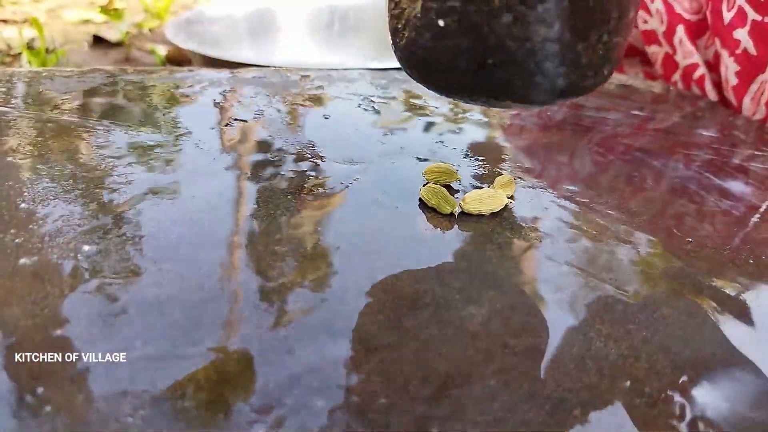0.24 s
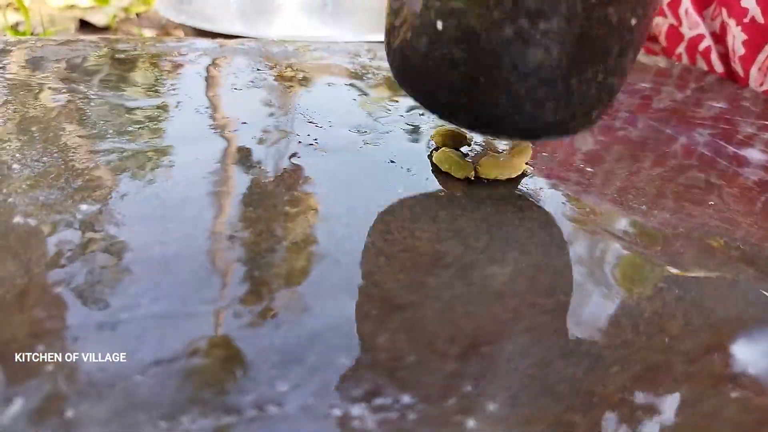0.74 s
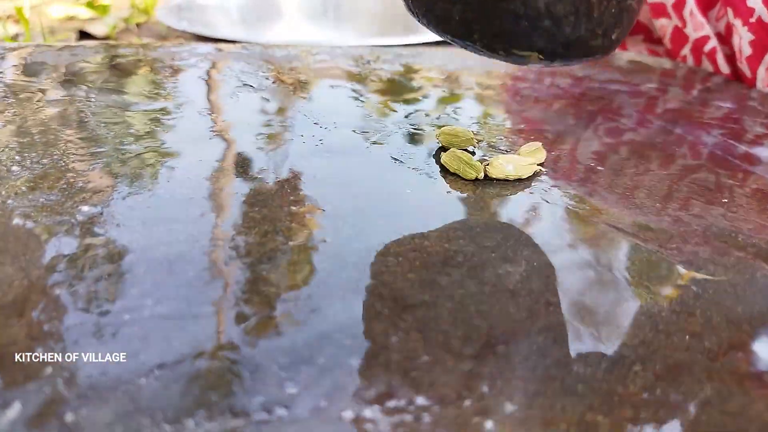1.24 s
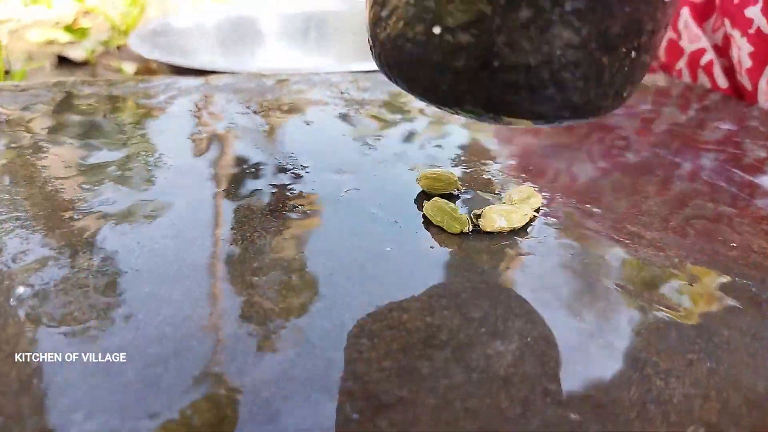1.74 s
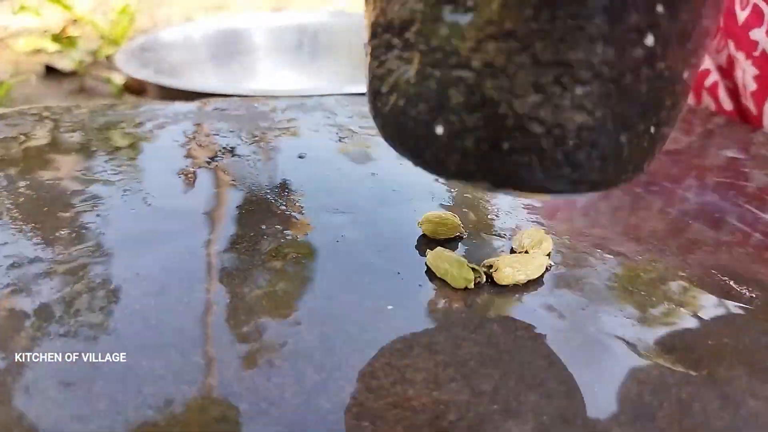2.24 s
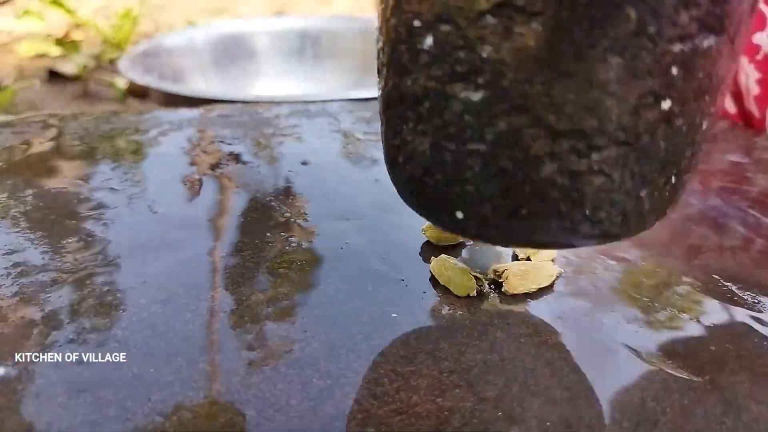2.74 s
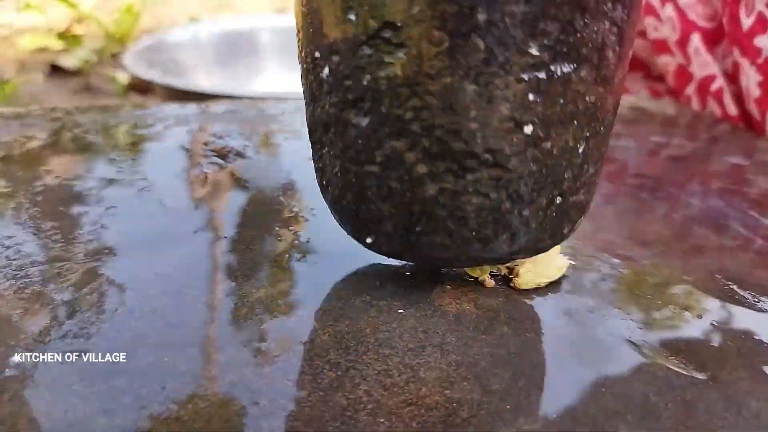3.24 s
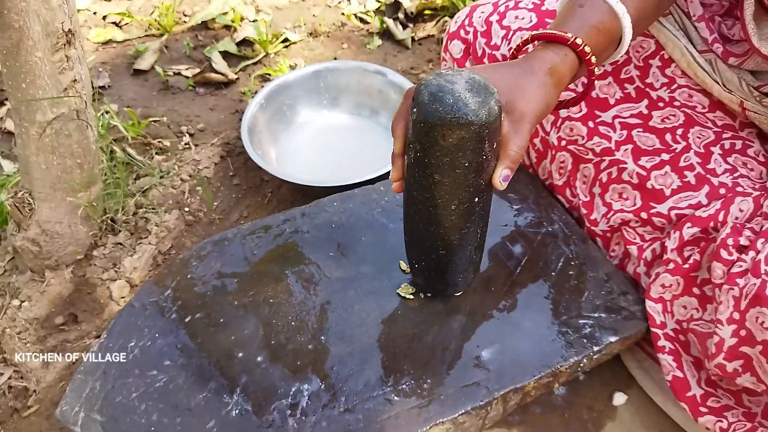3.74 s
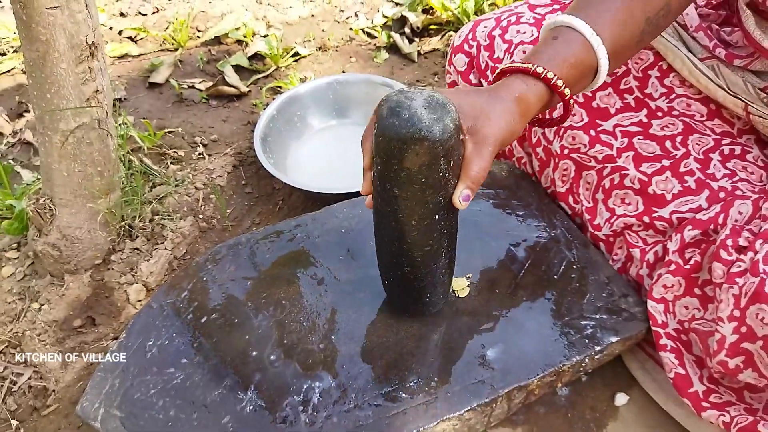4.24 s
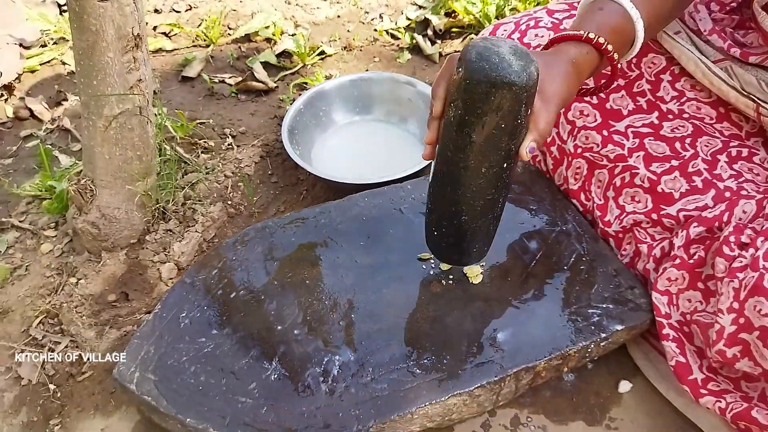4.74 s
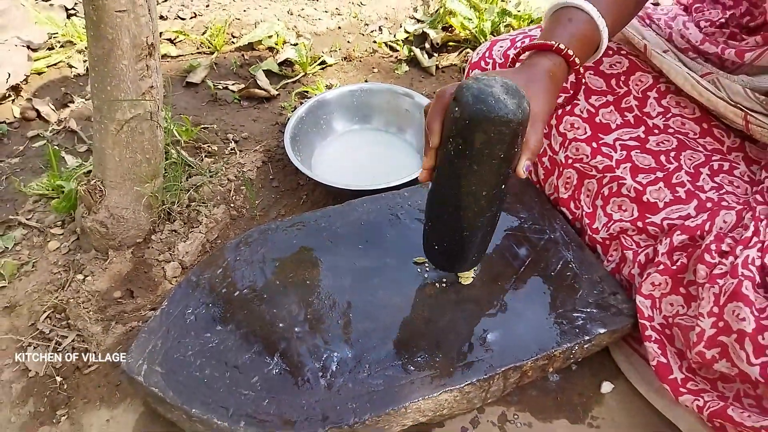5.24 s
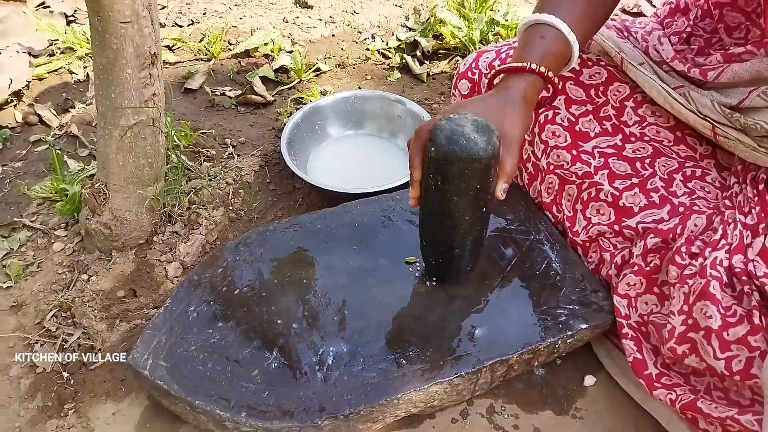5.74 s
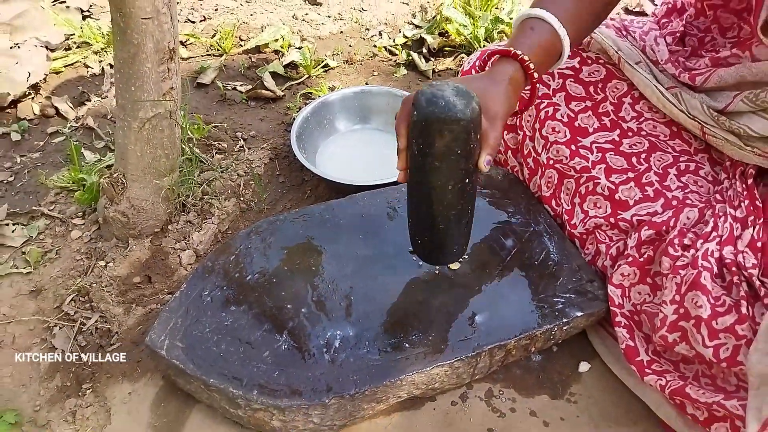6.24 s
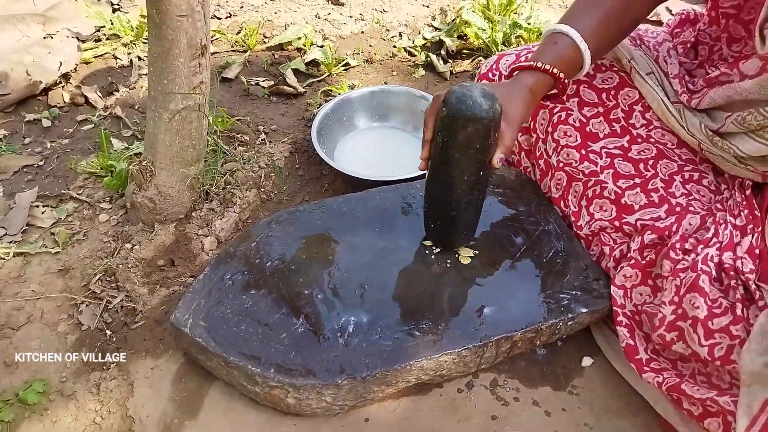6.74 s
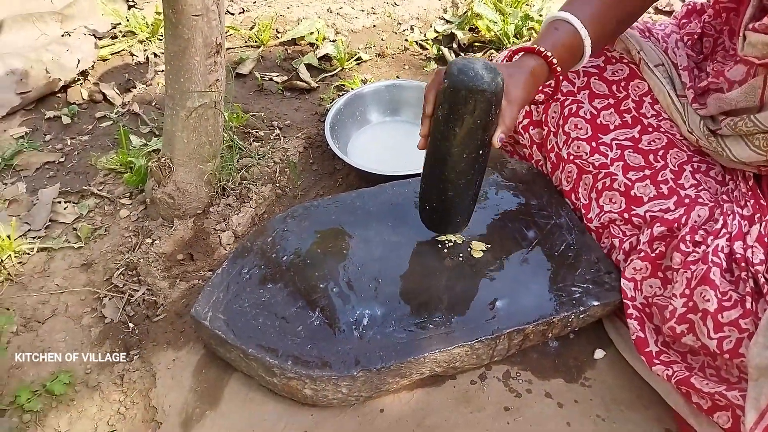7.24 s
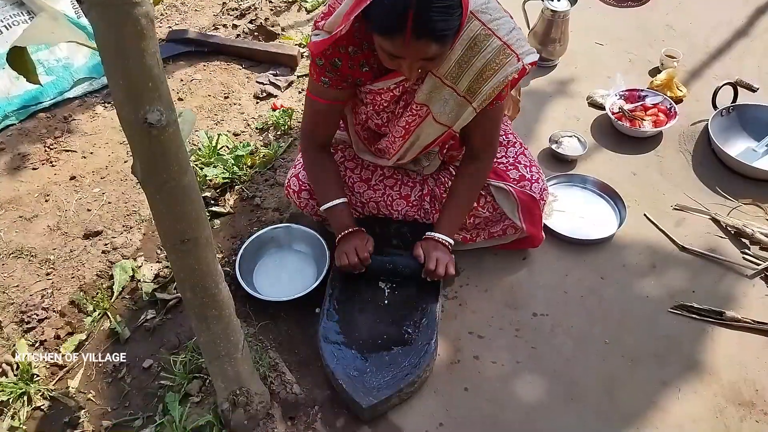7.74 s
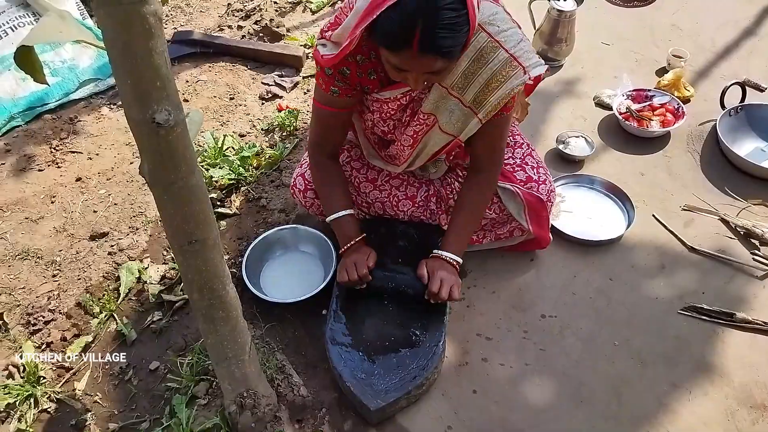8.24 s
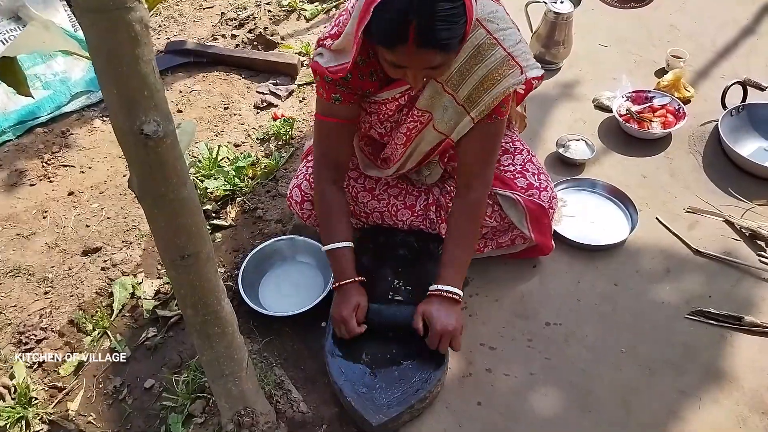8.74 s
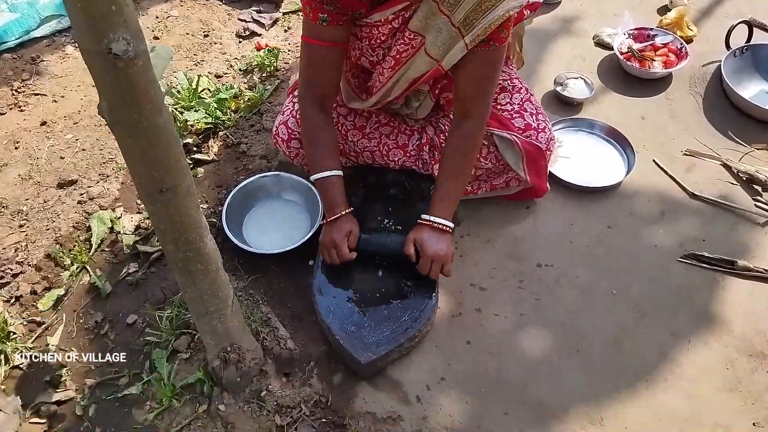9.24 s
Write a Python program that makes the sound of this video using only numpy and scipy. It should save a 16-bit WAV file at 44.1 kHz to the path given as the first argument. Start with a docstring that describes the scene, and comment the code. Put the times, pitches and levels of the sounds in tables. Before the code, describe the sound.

Outdoors over soft rumbling, hissing air with faint distant bird notes, an upright stone roller strikes a wet stone slab close to the microphone, each blow a crisp husk crunch, low thud and short stony ring. The view steps back and the blows grow harder and cleaner, with small snaps and wet fizz between them. Finally, further off, the flat roller rubs back and forth with knocks and crackles.

```python
"""Outdoors, over rumbling, hissing air, small birds call far off in thin sweeping notes.
Close to the microphones, the end of an upright stone roller pounds spice pods on a wet stone slab.
Each blow crunches husks in bursts of tiny cracks, thuds the slab on its earth bed and rings both stones.
From a step back the blows go on, single husks snap and wet pulp fizzes on the lifting roller.
Last, from further away, the roller lies flat: it rubs to and fro in filtered grains, knocks and crackles."""
import sys
import numpy as np
from scipy import signal
from scipy.fft import rfft, irfft
from scipy.io import wavfile
from scipy.ndimage import uniform_filter1d

SR = 44100
rng = np.random.default_rng(int(sys.argv[2]) if len(sys.argv) > 2 else 0)


def bounce(signal):
    """Save signal as a 16-bit WAV file at the path given by the first command-line argument."""
    frames = np.transpose(np.atleast_2d(signal))
    limited = np.clip(frames, -1, 1)
    pcm = np.round(limited * 32767).astype(np.int16)
    wavfile.write(sys.argv[1], SR, pcm)


N = 418509
TIME = np.arange(N) / SR
HIT = 8192  # samples in one short sound
PRE_S = .02  # room ahead of the contact in a short sound
SINCE = np.arange(HIT) / SR - PRE_S  # seconds since contact

# open air: start_s, rumble_db, hiss_db
AIR = [(0, -50.5, -56), (.5, -49.5, -58.5), (.68, -54, -65.5), (2.4, -54.5, -61.5), (3.35, -56, -65),
       (3.65, -52.5, -57), (4.9, -53, -57.5), (5.45, -52, -54.5), (6.05, -53, -54.5), (6.25, -58.5, -60.5),
       (6.75, -52.5, -56), (7.22, -57, -61.5), (7.75, -54, -55), (9.49, -53, -53.5)]
# colour of the low rumble of the air: pitch_hz, level_db
LOW_AIR_COLOUR = [(25, -17.5), (50, -11), (85, 5.5), (180, 5.5), (300, 2), (450, -3), (800, -15),
                  (1600, -53), (4000, -47.5)]
# colour of the distant hiss: pitch_hz, level_db
HIGH_AIR_COLOUR = [(300, 2.5), (1000, 1.5), (2300, 1.5), (3500, -3), (5000, -9), (7500, -14), (10000, -12),
                   (12500, -10.5), (15500, -20)]
# far bird notes: start_s, length_s, top_hz, arch_depth_hz, level_db
BIRD_NOTES = [(.09, 0.069, 2290, 50, -59), (2.234, 0.048, 4780, 500, -55.5), (2.33, .065, 4400, 700, -51.5),
              (2.387, 0.027, 4070, 1400, -55), (2.406, 0.036, 4450, 800, -60),
              (2.481, .045, 4970, 1100, -51), (2.533, 0.033, 3630, 910, -56.5),
              (2.614, 0.053, 4950, 1010, -58), (2.803, .035, 5050, 1100, -57.5),
              (2.853, 0.025, 4780, 1200, -52.5), (2.926, .025, 3720, 600, -64),
              (3.58, 0.15, 2170, 100, -62)]
# upright blows: start_s, strength_db, contact_ms, crunch_db, crunch_lead_ms
BLOWS = [(0.5718, -28.5, 0.66, -15, -0.5), (0.8607, -42.5, 1.1, -17.5, 2), (1.1379, -44, 1.36, -17, -0.4),
         (1.4046, -21, 1.02, -21.5, 4.5), (1.6681, -27, 0.58, -17, 2.5), (1.9313, -21.5, 0.94, -20, 2.3),
         (2.199, -18.5, 0.7, -21, .5), (2.4625, -16, .58, -27, 1.1), (2.72, -17.5, 0.65, -26, .9),
         (2.9834, -24.5, 0.88, -22, 3), (3.2605, -27.5, 0.62, -18, 3), (3.4511, -22, 0.87, -30, .5),
         (3.7257, -27.5, 1.05, -30, 3.5), (4.0083, -18, 0.68, -30, -0.5), (4.2729, -18, 0.78, -23.5, 1.5),
         (4.5469, -13, 0.51, -29.5, -0.3), (4.8499, -18.5, 0.85, -29, -0.5),
         (5.1354, -14.5, 0.67, -33.5, 2), (5.46, -26.5, 1.06, -24.5, 3.5), (5.7503, -27, 1.09, -30, 4.5),
         (6.1685, -12, 0.11, -37, 1), (6.5088, -16.5, 0.66, -32.5, 2), (6.7741, -13.5, 0.43, -30, -0.5),
         (7.0733, -13.5, 0.27, -33.5, 3), (7.0953, -31, 0.21, -54, 1.5)]
# slab rocking on the earth: pitch_hz, level_db, t60_s
BED_MODES = [(119.3, -5.5, .065), (186, -0.5, 0.046), (232, 2.5, 0.028), (331, -3.5, 0.028)]
# slab bending: pitch_hz, level_db, t60_s
SLAB_MODES = [(656.4, -2.5, 0.031), (721, 1, 0.024), (826, 1, 0.017), (1005, 5.5, 0.014),
              (1225, 7.5, 0.016)]
# roller bending: pitch_hz, level_db, t60_s
ROLLER_MODES = [(1336, -3, .014), (1558, 4, 0.022), (1757, -3.5, 0.043), (2072, -14, 0.029),
                (2540, -25.5, 0.015), (2950, -18.5, 0.01)]
# roller held upright, free to ring on across and along its length: pitch_hz, level_db, t60_s
UPRIGHT_MODES = [(1545, -13, .115), (4870, 8, .048), (4990, -2, .025)]
# colour of rough stone faces chattering: pitch_hz, level_db
CLACK_COLOUR = [(200, -14.5), (450, -12.5), (680, 5.5), (1000, -3.5), (1500, -1.5), (2000, -7.5),
                (2800, -12.5), (4000, -20), (6000, -38), (12000, -39.5)]
# colour of breaking husks: pitch_hz, level_db
HUSK_COLOUR = [(400, -4), (1000, -26), (2200, -16), (3500, -8.5), (5000, -0.5), (7000, 1), (9000, 3),
               (11000, 6), (11700, 2.5), (13000, 4.5), (15300, -3), (17000, -15)]
# colour of cracking seeds: pitch_hz, level_db
SEED_COLOUR = [(300, -2.5), (800, -8), (1500, -6.5), (2300, -2), (3000, -3), (4200, -10), (7000, -9.5),
               (14000, -40)]
# each part heard close up: left_minus_right_db, left_lead_ms
CLOSE_PLACES = {"bed": (1.2, .85), "slab": (3.5, .35), "roller": (.5, -.12), "husk": (-4, -.25)}
# each part heard from a step back: left_minus_right_db, left_lead_ms
BACK_PLACES = {"bed": (0, .03), "slab": (3.5, .03), "roller": (1.5, -.12), "husk": (-4, .07)}
# each part heard from further away: left_minus_right_db, left_lead_ms
FAR_PLACES = {"bed": (-.5, 0), "slab": (2.5, .1), "roller": (7, -.06)}
# single husks snap and wet bits unstick: start_s, relative_level_db
SNAPS = [(3.8289, -22), (3.8334, -29), (3.8724, -29), (4.7308, -33.5), (4.7617, -38), (5.8382, -31.5),
         (5.9333, -36), (7.4833, -23.5), (7.89, -31), (7.94, -26), (8.0022, -37.5), (8.305, -35),
         (8.331, -29), (8.349, -27), (8.382, -32.5), (8.7057, -28.5), (8.754, -28.5), (8.773, -30.5),
         (9.1345, -23), (9.1477, -24.5), (9.178, -27)]
# colour of snaps, fizz and crackle: pitch_hz, level_db
GRIT_COLOUR = [(1500, -17), (4000, -0.5), (7000, 4), (9500, 9), (11000, 5), (12500, 1), (15500, -1.5),
               (17000, -26.5)]
# wet pulp clings to the lifting roller and fizzes: start_s, length_s, relative_level_db
PULP = [(4.623, 0.39, -62), (5.23, 0.36, -58.5), (5.801, 0.54, -66), (6.48, .3, -60.5)]
# one push and pull of the flat roller each: start_s, stone_rumble_db, paste_grit_db, husk_crackle_db
STROKES = [(7.338, -47.5, -59, -54), (7.744, -46, -59.5, -54), (8.151, -51, -64.5, -53),
           (8.55, -47, -61, -50), (8.948, -45, -58, -52), (9.345, -49, -62, -56)]
# colour of the stones rubbing: pitch_hz, level_db
RUMBLE_COLOUR = [(200, -18), (450, -25.5), (660, 1), (900, -10.5), (1300, -7), (1570, 9), (1900, -8.5),
                 (3000, -7.5), (5000, -8)]
# colour of paste squeezed under the flat roller: pitch_hz, level_db
SQUELCH_COLOUR = [(2000, -46), (4500, 4), (7500, -11.5), (9400, 13.5), (11000, -1), (12500, -2),
                  (14000, -4), (15500, 9), (17000, -30)]
# the flat roller tips onto the slab: start_s, contact_ms, slab_clack_db, roller_ring_db
KNOCKS = [(7.35, .057, -19.5, -14), (7.5182, 0.12, -28.5, -13), (7.7571, 0.033, -19, -16.5),
          (7.929, 0.61, -37.5, -34), (8.1513, 0.048, -17.5, -11), (8.5564, 0.043, -20, -12.5),
          (8.7434, 0.09, -30, -17), (8.9498, 0.13, -24.5, -22), (9.1476, 0.072, -30.5, -17),
          (9.2643, 0.18, -37, -30), (9.3576, .07, -20, -16)]
# yard reflections by band: low_hz, high_hz, early_db, early_t60_s, late_db, late_t60_s
YARD = [(80, 450, -21, .11, -35, .35), (450, 2600, -23, .11, -37, .3), (2600, 15000, -32, .03, -34, .42)]

CLOSE_UNTIL_S = 3.35
# Pulp cushions a blow: longer contact, more thud and less ring. (dB re strength, dB per ms of contact)
THUD_LAW, RING_LAW, CHATTER_LAW = (-13, 19.16), (-4.5, -15.5), (-12.5, -40.5)
CLOSE_THUD_DB = 7  # extra bass close to the slab
SEED_CLOSE_DB, SEED_BACK_DB, CRUMBLE_DB = -14.5, -23.5, -28.5  # re crunch
WHOLE_POD_DB = 8.5  # more seed crack as the first blow bursts whole pods
BUILD_WHOLE_MS, BUILD_FLAT_MS = 3.25, 2.73  # the load builds faster once the pods are flattened
PUSH_S, PULL_AFTER_S, PULL_S = 0.23, 0.31, 0.095  # the roller rests briefly at the far end
HUSKS_AFTER_S, HUSKS_S = 0.13, 0.062  # late in each push it rides over the heap of husks
TOP_HZ = 16200


def undb(db):
    """Decibels to gain."""
    return 10 ** (np.asarray(db) / 20)


def colour(x, points):
    """Causal minimum-phase filter through (Hz, dB) points, made by folding the cepstrum."""
    bins_hz = np.maximum(np.fft.rfftfreq(4096, 1 / SR), 1)
    hz, db = np.transpose(points)
    gain = undb(np.interp(np.log(bins_hz), np.log(hz), db))
    cepstrum = irfft(np.log(gain))
    half = len(cepstrum) // 2
    cepstrum[1:half] *= 2
    cepstrum[half + 1:] = 0
    response = irfft(np.exp(rfft(cepstrum)))[:half]
    return signal.fftconvolve(x, response)[:len(x)]


def unit(x):
    """Scale to rms 1."""
    return x / np.sqrt(np.mean(x ** 2))


def burst(x, db):
    """Scale a short sound so that its energy, spread over 10 ms, has this level."""
    return x * undb(db) * np.sqrt(SR / 100 / np.sum(x ** 2))


def ports(x, pan_db, lag_ms):
    """Two microphone ports: the left is louder by pan_db and earlier by lag_ms."""
    turn = np.exp(-1j * np.pi * np.fft.rfftfreq(len(x), 1 / SR) * lag_ms / 1000)
    gain = undb(np.array([[pan_db], [-pan_db]]) / 2)
    return unit(gain) * irfft(rfft(x) * np.array([1 / turn, turn]), len(x))


def add(out, s, sound):
    """Mix a stereo sound in, starting at time s."""
    i = int(s * SR)
    out[:, i:i + sound.shape[1]] += sound[:, :N - i]


def walk(rate_hz):
    """Slow random wander: random steps smoothed over one step length."""
    k = int(SR / rate_hz)
    steps = np.repeat(rng.standard_normal(N // k + 1), k)
    return uniform_filter1d(steps, k)[:N]


def grains(size, per_s, spread_db):
    """Random tiny cracks, a few much larger than the rest."""
    strength = undb(spread_db * np.minimum(rng.exponential(size=size), 4))
    return (rng.random(size) < per_s / SR) * rng.standard_normal(size) * strength


def swell(s, length_s, fullness=0.63):
    """One arched rise and fall, as in a movement of the hand."""
    u = (TIME - s) / length_s
    return np.maximum(4 * u * (1 - u), 0) ** fullness


def air(rumble_width=0.42, hiss_width=1.0):
    """Outdoor background: a rumble much alike at both ports and a wide hiss, both wandering in level."""
    out = 0
    start_s, rumble_db, hiss_db = np.transpose(AIR)
    layers = ((rumble_db, LOW_AIR_COLOUR, rumble_width), (hiss_db, HIGH_AIR_COLOUR, hiss_width))
    for level_db, points, width in layers:
        gain = undb(np.interp(TIME, start_s, level_db) + 1.1 * walk(12))
        mid = unit(colour(rng.standard_normal(N), points))
        side = unit(colour(rng.standard_normal(N), points))
        out = out + gain * (mid + width * side * np.array([[1], [-1]]))
    return out


def bird(waver_hz=150, trees_db=-1, trees_s=0.038):
    """Thin notes that sweep up, level off and drop, with a quick waver, blurred by the trees."""
    out, waver = np.zeros((2, N)), walk(270)
    for s, length_s, top_hz, arch_hz, db in BIRD_NOTES:
        u = np.linspace(-1, 1, int(length_s * SR))
        waver_depth_hz = min(waver_hz, arch_hz / 2)
        hz = top_hz - arch_hz * np.abs(u) ** 3 + waver_depth_hz * waver[int(s * SR):][:len(u)]
        note = undb(db) * np.sqrt(1 - u ** 2) * np.sin(2 * np.pi * np.cumsum(hz) / SR)
        add(out, s, ports(note, pan_db=-2, lag_ms=0.013))
    fade = np.exp(-TIME[:SR // 4] / trees_s)
    scatter = rng.standard_normal((2, len(fade))) * fade / np.linalg.norm(fade)
    return out + undb(trees_db) * signal.fftconvolve(out, scatter, axes=1)[:, :N]


def crunch(build_ms, snap=0.93):
    """Husk fibres crack ever more strongly as the load builds, until the pod gives way in one snap."""
    ms = SINCE * 1000
    load = np.exp(np.where(ms < 0, -(ms / build_ms) ** 2, -ms / 1.7))
    fibres = burst(load * grains(HIT, per_s=25000, spread_db=5.5), 0)
    collapse = burst(np.exp(-np.abs(ms) / 0.37) * rng.standard_normal(HIT), 0)
    return colour(fibres + snap * collapse, HUSK_COLOUR)


def crumble(decay_s=.035):
    """Broken husks settle and unstick as the load comes off."""
    fade = (SINCE > 0) * np.exp(-np.abs(SINCE) / decay_s)
    return colour(fade * grains(HIT, per_s=1500, spread_db=3), HUSK_COLOUR)


def crack(decay_s=0.0015):
    """The hard seeds inside the pod split with a short, dry click."""
    fade = (SINCE > 0) * np.exp(-np.abs(SINCE) / decay_s)
    return colour(fade * rng.standard_normal(HIT), SEED_COLOUR)


def ring(modes, contact_ms, facing=1, radiate=0.94):
    """Modes pushed by one smooth contact; a longer contact leaves out the high ones."""
    t = np.maximum(SINCE, 0)
    hz, db, t60 = np.transpose(modes)[:, :, None]
    # every blow varies the mode levels and slightly the pitches
    level_chance, pitch_chance = rng.standard_normal((2, len(modes), 1))
    decay = undb(db + 1.5 * level_chance - 60 * t / t60)
    swing = decay * np.sin(2 * np.pi * hz * (1 + .008 * pitch_chance) * t)
    # seen from the far end (facing -1), neighbouring modes move in opposite directions
    sound = swing[::2].sum(0) + np.sign(facing) * swing[1::2].sum(0)
    # below its first mode a body hardly radiates
    highpass = signal.butter(3, radiate * hz.min(), "highpass", fs=SR, output="sos")
    sound = signal.sosfilt(highpass, sound)
    force = 1 / np.cosh(np.clip(SINCE * 1000 / (contact_ms / 2), -50, 50))
    return signal.fftconvolve(sound, force)[int(PRE_S * SR):][:HIT]


def thud(contact_ms, ahead_ms=0.54):
    """The slab starts to rock on the earth as soon as the load builds."""
    return np.roll(np.gradient(ring(BED_MODES, contact_ms)), -int(ahead_ms * SR / 1000))


def chatter(decay_s=0.0052, skid_db=-22, skid_s=0.034):
    """Rough stone faces chatter as they meet, then skid a little."""
    t = np.abs(SINCE)
    shape = (SINCE > 0) * (np.exp(-t / decay_s) + undb(skid_db) * np.exp(-t / skid_s))
    return colour(shape * grains(HIT, per_s=9000, spread_db=2), CLACK_COLOUR)


def pounding(pulse_db=-15, pulse_s=0.0048):
    """The roller's end crushes the pods and lands on the slab, with contact time setting thud against ring."""
    out = np.zeros((2, N))
    for i, (s, db, contact_ms, crunch_db, lead_ms) in enumerate(BLOWS):
        close = s < CLOSE_UNTIL_S
        place = CLOSE_PLACES if close else BACK_PLACES
        laws = (THUD_LAW, RING_LAW, CHATTER_LAW)
        thud_db, roller_db, chatter_db = (db + base + slope * contact_ms for base, slope in laws)
        bed = burst(thud(contact_ms), thud_db + close * CLOSE_THUD_DB)
        slab = burst(ring(SLAB_MODES, contact_ms), db) + burst(chatter(), chatter_db)
        roller = burst(ring(ROLLER_MODES + UPRIGHT_MODES, contact_ms, facing=-1), roller_db)
        stone = ports(bed, *place["bed"]) + ports(slab, *place["slab"]) + ports(roller, *place["roller"])
        add(out, s - PRE_S, stone)

        husks = burst(crunch(BUILD_WHOLE_MS if close else BUILD_FLAT_MS), crunch_db)
        if close:
            # a short low-pitched pulse under each close crunch
            husks = husks - burst(np.exp(-(SINCE / pulse_s) ** 2), crunch_db + pulse_db)
        husks = husks + burst(crumble(), crunch_db + CRUMBLE_DB)
        seed_db = crunch_db + (SEED_CLOSE_DB if close else SEED_BACK_DB) + (i == 0) * WHOLE_POD_DB
        pod = ports(husks, *place["husk"]) + ports(burst(crack(), seed_db), *place["roller"])
        add(out, s - PRE_S - lead_ms / 1000, pod)
    return out


def snapping(snap_db=-9, decay_s=0.006, crumble_db=-19, crumble_s=0.0097):
    """Husks snap in a quickly fading cluster of grains, with weaker ones on either side of its start."""
    out = np.zeros((2, N))
    for s, db in SNAPS:
        sharp = (SINCE > 0) * np.exp(-np.abs(SINCE) / decay_s)
        weak = undb(crumble_db) * np.exp(-np.abs(SINCE) / crumble_s)
        tick = colour((sharp + weak) * grains(HIT, per_s=6000, spread_db=2), GRIT_COLOUR)
        pan_db = 4 if s > STROKES[0][0] else -3.5  # to the left once the rubbing has begun
        add(out, s - PRE_S, ports(burst(tick, db + snap_db), pan_db, lag_ms=0.076))
    return out


def pulp_fizz(pulp_db=-1):
    """Wet pulp clinging to the lifting roller fizzes in dense fine grains."""
    level = sum(undb(db + pulp_db) * swell(s, length_s) for s, length_s, db in PULP)
    fizz = unit(colour(grains(N, per_s=3000, spread_db=3), GRIT_COLOUR)) * undb(2 * walk(30))
    return ports(level * fizz, pan_db=-3.0, lag_ms=0.023)


def rubbing(pull_stone_db=-3, pull_grit_db=1):
    """Grains under the roller excite the stones on each push and pull; paste and husks crackle above."""
    stone = grit = husks = 0
    for s, stone_db, grit_db, husk_db in STROKES:
        push, pull = swell(s, PUSH_S), swell(s + PULL_AFTER_S, PULL_S)
        stone = stone + undb(stone_db) * (push + undb(pull_stone_db) * pull)
        grit = grit + undb(grit_db) * (push + undb(pull_grit_db) * pull)
        husks = husks + undb(husk_db) * swell(s + HUSKS_AFTER_S, HUSKS_S)
    rumble = unit(colour(grains(N, per_s=2500, spread_db=2.5), RUMBLE_COLOUR)) * undb(2.5 * walk(30))
    # fine grit, its level wandering at random, with sparser, coarser pops
    fine = unit(colour(grains(N, per_s=1100, spread_db=4), SQUELCH_COLOUR)) * undb(4.5 * walk(45))
    pops = unit(colour(grains(N, per_s=70, spread_db=3), SQUELCH_COLOUR))
    crackle = unit(colour(grains(N, per_s=600, spread_db=4), GRIT_COLOUR)) * undb(4 * walk(120))
    out = ports(stone * rumble, pan_db=3.5, lag_ms=0.042)
    return out + ports(grit * (fine + pops) + husks * crackle, pan_db=3.5, lag_ms=0.0071)


def knocking(bounce_ms=2.56, bounce_db=-5, chatter_db=-3, thud_db=-20, rock_s=.021, rock_db=-17):
    """Stone on stone: one roller end lands just before the other, faces chatter, and it rocks back once."""
    out = np.zeros((2, N))
    for s, contact_ms, slab_db, roller_db in KNOCKS:
        first_end = ring(ROLLER_MODES, contact_ms, facing=-1)
        second_end = undb(bounce_db) * np.roll(first_end, int(bounce_ms * SR / 1000))
        roller = burst(first_end + second_end, roller_db)
        slab = burst(ring(SLAB_MODES, contact_ms), slab_db) + burst(chatter(), slab_db + chatter_db)
        stone = ports(burst(thud(contact_ms), slab_db + thud_db), *FAR_PLACES["bed"])
        stone += ports(slab, *FAR_PLACES["slab"])
        stone += ports(roller, *FAR_PLACES["roller"])
        add(out, s - PRE_S, stone)
        rock = burst(ring(ROLLER_MODES, contact_ms), slab_db + rock_db)
        add(out, s - PRE_S + rock_s, ports(rock, *FAR_PLACES["roller"]))
    return out


def yard(dry, gap_s=0.0055):
    """Ground and nearby things scatter a short tail; walls further off add a faint longer one."""
    t = np.arange(SR // 2) / SR
    response = np.zeros((2, len(t)))
    for low_hz, high_hz, early_db, early_t60, late_db, late_t60 in YARD:
        band = signal.butter(2, [low_hz, high_hz], "bandpass", fs=SR, output="sos")
        for db, t60 in ((early_db, early_t60), (late_db, late_t60)):
            fade = (t > gap_s) * np.exp(-np.log(1000) * t / t60)
            tail = rng.standard_normal((2, len(t))) * fade * undb(db) / np.linalg.norm(fade)
            response += signal.sosfilt(band, tail)
    return signal.fftconvolve(dry, response, axes=1)[:, :N]


def scene():
    """Birds and all the work at the slab, in the open yard, over the air."""
    dry = bird() + pounding() + snapping() + pulp_fizz() + rubbing() + knocking()
    return dry + yard(dry) + air()


def record(dry):
    """Anything beyond full scale is clipped, then a steep low-pass cuts the top."""
    lowpass = signal.ellip(10, .2, 90, TOP_HZ, fs=SR, output="sos")
    return signal.sosfilt(lowpass, np.clip(dry, -1, 1))


dry = scene()
out = record(dry)
bounce(out)
```